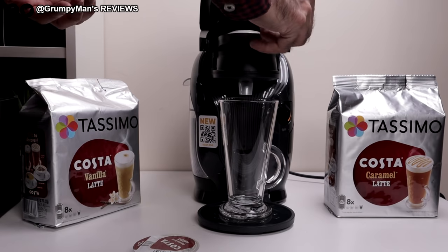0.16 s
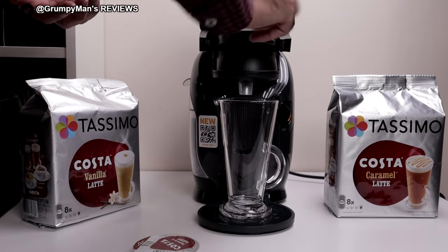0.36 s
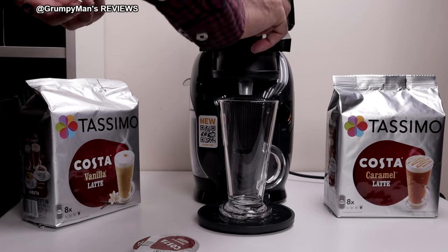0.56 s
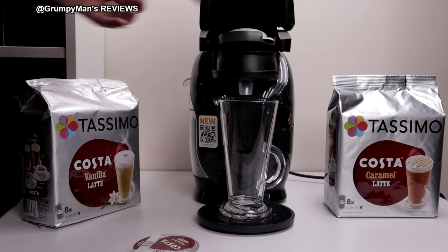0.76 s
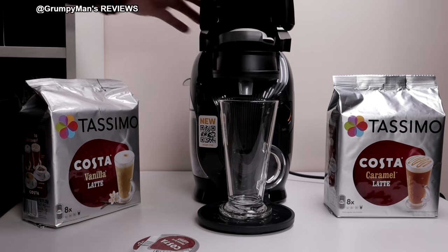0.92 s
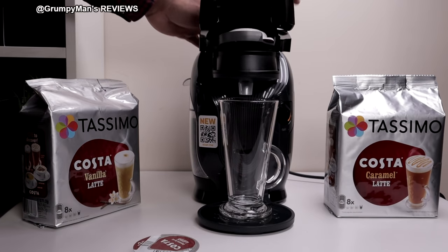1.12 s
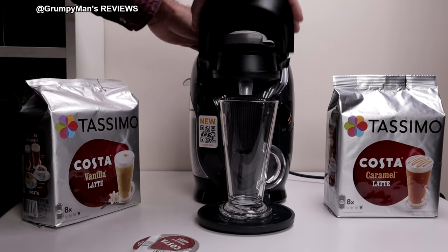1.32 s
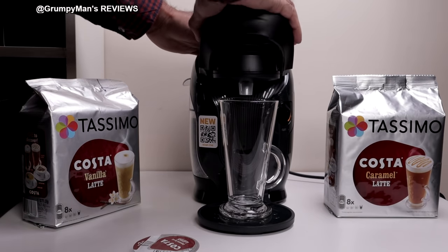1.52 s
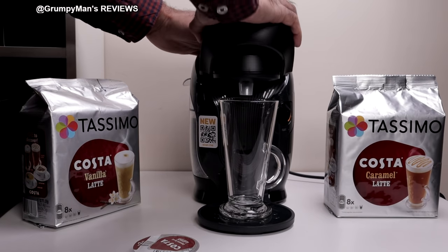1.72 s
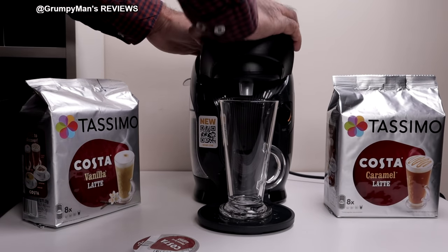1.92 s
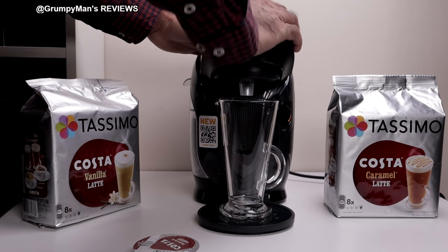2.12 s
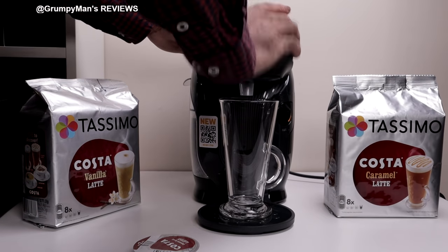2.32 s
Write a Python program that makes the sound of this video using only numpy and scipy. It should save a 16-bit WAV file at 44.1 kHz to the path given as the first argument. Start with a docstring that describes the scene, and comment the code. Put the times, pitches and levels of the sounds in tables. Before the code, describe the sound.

A pod coffee machine being loaded and closed, with small plastic knocks, clicks and scrapes.

```python
"""Loading a pod coffee machine.

A hand seats a pod, reaches up, swings the lid down and presses it until it latches. Each contact
rings the hollow plastic housing and rattles its thin panels. Plastic scrapes between the knocks,
a sleeve swishes, the hinge rubs. Small room, one close microphone."""
import sys
import numpy as np
from scipy import signal
from scipy.fft import rfft, irfft, next_fast_len
from scipy.io import wavfile

SR = 44100
rng = np.random.default_rng(int(sys.argv[2]) if len(sys.argv) > 2 else 0)


def wav_record(signal):
    """Record a signal, one row per channel, as 16-bit PCM in the file named by sys.argv[1]."""
    frames = np.transpose(np.atleast_2d(signal))
    bounded = np.clip(frames, -1, 1)
    # unit amplitude maps onto the largest positive 16-bit level
    quanta = np.round(bounded * 32767).astype(np.int16)
    wavfile.write(sys.argv[1], SR, quanta)


N = 104693

# Room tail. Each row: frequency in Hz, T60 in seconds.
ROOM_T60_S = [(150, 0.63), (400, 0.16), (1000, 0.27), (3000, 0.19), (8000, 0.28), (16000, 0.13)]
# Room tail. Each row: frequency in Hz, gain in dB.
ROOM_GAIN_DB = [(150, -17), (300, -9), (600, -2), (1000, -10.5), (3000, -8), (8000, -13), (16000, -16)]
# Noise and friction spectra. Each row: frequency in Hz, relative level in dB.
FLOOR_COLOUR_DB = [(20, -34.5), (55, 6.5), (100, -7), (150, 11.5), (220, 1), (310, 7), (500, -5),
                   (900, -15.5), (2000, -20), (4000, -20.5), (10000, -17.5), (16000, -21)]
RUMBLE_COLOUR_DB = [(20, 0), (36, 0), (50, 16.5), (75, 6.5), (120, 7.5), (200, -28.5), (500, -1),
                    (2000, -90)]
SLEEVE_COLOUR_DB = [(80, 5.5), (400, 6.5), (900, -1), (2000, -7), (3500, -10), (6000, -12.5), (9500, -23),
                    (13000, -22), (16000, -25)]
HINGE_COLOUR_DB = [(100, -34), (320, 10), (550, -6), (950, 2), (1900, -8.5), (2800, -16.5), (6000, -30),
                   (16000, -41)]
SCRAPE_BODY_COLOUR_DB = [(100, -14.5), (165, -1), (225, -20), (305, 7), (370, -2.5), (650, -13), (900, -7),
                         (1600, -18), (2500, -26), (6000, -43)]
SCRAPE_SQUEAK_COLOUR_DB = [(800, 6.5), (2000, 8.5), (3100, 1), (3700, 4.5), (4050, 4), (4400, 3),
                           (4900, -11.5), (7500, -16.5), (16000, -37)]
# Envelopes. Each row: time in seconds, level in dB.
RUMBLE_LEVEL_DB = [(.93, -70), (1.02, -56.5), (1.12, -61.5), (1.2, -68), (1.68, -64), (1.77, -60),
                   (1.9, -60.5), (2.05, -61), (2.2, -75)]
SLEEVE_LEVEL_DB = [(.8, -72), (.9, -63.5), (1.0, -56), (1.11, -56), (1.18, -62.5), (1.3, -68.5), (1.5, -65)]
HINGE_LEVEL_DB = [(1.2, -73), (1.25, -67), (1.28, -52), (1.41, -57), (1.45, -60), (1.53, -62.5),
                  (1.62, -57), (1.68, -68), (1.8, -57.5), (2.1, -65), (2.2, -123)]
# Plastic sliding on plastic. Each row: peak time, rise and fall in seconds, body and squeak in dB.
SCRAPE_STROKES = [(.012, 0.076, 0.014, -49, -61.5), (.18, 0.017, .015, -58, -72),
                  (0.22, 0.0095, 0.005, -52, -48), (0.394, 0.051, 0.018, -58.5, -73),
                  (0.418, 0.0072, 0.0063, -60.5, -60), (2.146, 0.016, 0.0096, -57, -87),
                  (2.227, 0.011, 0.014, -52, -81), (2.303, 0.0093, 0.016, -53, -52),
                  (2.36, 0.04, 0.039, -54, -69.5)]
# Dry ticks. Each row: start in seconds, level in dB.
TICK_EVENTS = [(1.1936, -48.5), (1.7817, -56)]
# Housing and lid modes. Each row: frequency in Hz, relative level in dB, T60 in seconds.
HOUSING_MODES = [(166.4, 0, 0.13), (306.2, -0.5, 0.067), (331.3, -4, 0.07), (399.6, -16, 0.087),
                 (535.4, -7, .08), (685.4, -11.5, 0.12), (872.2, 7, 0.033), (991, 2.5, 0.037),
                 (1383, 2, 0.036), (1743, 9, 0.013), (2000, -16, 0.037), (3095, 17, 0.045),
                 (3606, 12.5, 0.041), (5120, -22.5, 0.11), (5290, -6.5, 0.017), (12500, 0, .015)]
# Contact bands, thud to snap. Each row: low and high edge in Hz, rise and rattle T60 in seconds,
# rattle over the modes in dB.
CONTACT_BANDS = [(102.6, 189.4, 0.0013, 0.12, -0.5), (264, 502, 0.0055, 0.042, -7.5),
                 (481, 1300, 0.0004, 0.072, -5.5), (1065, 1978, 0.00022, 0.038, 0),
                 (2310, 5800, .0004, 0.033, 5.5), (6200, 14300, 0.00034, 0.028, 18)]
# Pod, lid and latch blows. Each row: start in seconds, then thud, hollow, knock, clack, click, snap in dB.
CONTACT_EVENTS = [ (0.0254, -68, -40.5, -38, -45, -51.5, -66.5), (.0315, -64.5, -33, -35, -62, -54.5, -78),
                  (0.043, -56, -33, -45.5, -50, -61.5, -78), (0.062, -56, -64, -62, -50, -66, -75),
                  (0.089, -53.5, -59, -49, -61.5, -68, -86), (0.2173, -81, -56, -61, -58.5, -51, -61.5),
                  (0.2227, -59, -34, -35, -44, -47.5, -64), (.229, -50, -35.5, -40.5, -57, -70, -76),
                  (0.2403, -57, -50, -35.5, -44, -60, -59.5), (0.2526, -59, -28, -34, -42.5, -44, -55.5),
                  (0.2575, -55, -36.5, -32.5, -55, -47, -73), (0.328, -55.5, -72, -50.5, -50.5, -70, -83),
                  (0.5052, -63, -63.5, -46.5, -58.5, -64, -89), (.514, -58.5, -44, -47, -60, -74, -111),
                  (.674, -58, -59.5, -53, -63, -80, -94), (0.684, -57.5, -51.5, -52.5, -56, -78, -93),
                  (0.9756, -53, -56, -60.5, -75, -73, -85), (1.113, -67, -56, -60.5, -72, -79, -80),
                  (1.238, -56, -62.5, -65, -69, -66, -82), (1.2696, -56, -41.5, -51, -50.5, -63, -85),
                  (1.2993, -53, -55, -46, -71, -65, -80), (1.341, -54, -47, -53.5, -75, -80, -82),
                  (1.5544, -51.5, -43.5, -36.5, -41.5, -56, -78), (1.6847, -64, -50, -48, -85, -83, -89),
                  (1.708, -66, -38, -29, -38.5, -43.5, -54.5), (1.721, -38, -47, -62, -63, -53.5, -70),
                  (1.737, -55, -49, -37.5, -51, -59, -81), (1.836, -68, -38.5, -39.5, -48, -61, -86),
                  (1.8639, -42, -35, -33.5, -41.5, -55.5, -64.5), (1.8743, -48, -43.5, -52, -58, -69, -85),
                  (1.9983, -50.5, -46.5, -39, -51.5, -59, -83), (2.018, -60, -51, -50, -62, -64.5, -76),
                  (2.035, -55, -45, -49.5, -58.5, -70, -87), (2.075, -63.5, -62, -64.5, -61, -69, -93),
                  (2.306, -64, -45, -50, -61, -65, -95), (2.321, -54, -49.5, -59, -57, -69, -90)]

FLOOR_DB = -70.5
ROOM_DELAY_S = 0.008
BOOM_DELAY_S, BOOM_DB, BOOM_BAND_HZ = 0.057, -18.5, (131, 435)
SLIPS_PER_S = 5400
TICK_T60_S, TICK_BAND_HZ = 0.007, (1800, 16000)
MODE_SCATTER_DB, MODE_DETUNE_RATIO = -0.5, 0.0065  # random, per blow
CUTOFF_HZ = 16000


def amp(db):
    """Decibels to gain."""
    return 10 ** (np.asarray(db) / 20)


def log_interp(points, hz):
    """Interpolate (Hz, value) points on a log frequency axis."""
    points_hz, values = np.transpose(points)
    return np.interp(np.log(hz + 1), np.log(points_hz + 1), values)


def envelope(points):
    """Gain per sample from (s, dB) points."""
    return amp(np.interp(np.arange(N) / SR, *np.transpose(points)))


def filtered(x, response):
    """Zero-phase filter with gain response(hz)."""
    size = next_fast_len(N + SR // 2)
    hz = np.fft.rfftfreq(size, 1 / SR)
    return irfft(rfft(x, size) * response(hz), size)[:N]


def coloured(x, colour):
    """Shape x by (Hz, dB) points; scale to rms 1."""
    shaped = filtered(x, lambda hz: amp(log_interp(colour, hz)))
    return shaped / np.sqrt(np.mean(shaped ** 2) + 1e-20)


def bandpass(x, lo_hz, hi_hz, order=3):
    """Causal Butterworth band-pass."""
    return signal.sosfilt(signal.butter(order, [lo_hz, hi_hz], 'band', fs=SR, output='sos'), x)


def equal_energy(x):
    """Scale to the energy of 12.5 ms at rms 1."""
    return x / np.sqrt(np.sum(x ** 2) / (0.0125 * SR) + 1e-20)


def add(track, start_s, sound):
    """Mix a sound into the track."""
    part = track[round(start_s * SR):][:len(sound)]
    part += sound[:len(part)]


def in_room(x):
    """Direct sound, a diffuse tail longest in the bass, and one late low boom from the walls."""
    length = SR // 2
    hz, t, spectra = signal.stft(rng.standard_normal(length), SR, nperseg=256)
    decay = amp(-60 * t / log_interp(ROOM_T60_S, hz)[:, None])
    decay /= np.sqrt(np.mean(decay ** 2, axis=1, keepdims=True) * length)
    gain = amp(log_interp(ROOM_GAIN_DB, hz))[:, None]
    _, tail = signal.istft(spectra * decay * gain, SR, nperseg=256)
    response = np.pad(tail, (round(ROOM_DELAY_S * SR) + 1, 0))
    pulse = signal.unit_impulse(SR // 10)
    add(response, 0, pulse)
    add(response, BOOM_DELAY_S, amp(BOOM_DB) * bandpass(pulse, *BOOM_BAND_HZ, order=2))
    return signal.fftconvolve(x, response)


def room_floor():
    """Steady noise of the quiet room."""
    return amp(FLOOR_DB) * coloured(rng.standard_normal(N), FLOOR_COLOUR_DB)


def arm_movement():
    """Sleeve swish and low rumble as the arm moves."""
    swish = envelope(SLEEVE_LEVEL_DB) * coloured(rng.standard_normal(N), SLEEVE_COLOUR_DB)
    rumble = envelope(RUMBLE_LEVEL_DB) * coloured(rng.standard_normal(N), RUMBLE_COLOUR_DB)
    return swish + rumble


def friction(colour):
    """Tiny random slips of uneven size, coloured by the rubbing part."""
    slips = rng.random(N) < SLIPS_PER_S / SR
    return coloured(slips * rng.standard_normal(N), colour)


def hinge():
    """Hinge friction as the lid comes down."""
    return envelope(HINGE_LEVEL_DB) * friction(HINGE_COLOUR_DB)


def scrapes():
    """Plastic slides on plastic; each stroke swells and fades."""
    out, t = np.zeros(N), np.arange(N) / SR
    body, squeak = friction(SCRAPE_BODY_COLOUR_DB), friction(SCRAPE_SQUEAK_COLOUR_DB)
    for peak_s, rise_s, fall_s, body_db, squeak_db in SCRAPE_STROKES:
        width_s = np.where(t < peak_s, rise_s, fall_s)
        stroke = np.exp(-0.5 * ((t - peak_s) / width_s) ** 2)
        out += stroke * (amp(body_db) * body + amp(squeak_db) * squeak)
    return out


def ticks():
    """Bright ticks, too light to ring the housing."""
    out, t = np.zeros(N), np.arange(SR // 20) / SR
    for start_s, db in TICK_EVENTS:
        burst = rng.standard_normal(len(t)) * amp(-60 * t / TICK_T60_S)
        add(out, start_s, amp(db) * bandpass(burst, *TICK_BAND_HZ, order=1))
    return out


def housing_ring(t, lo_hz, hi_hz):
    """Damped housing modes within one band, alternating in sign."""
    ring = np.zeros(len(t))
    for k, (hz, db, t60_s) in enumerate(HOUSING_MODES):
        if lo_hz < hz < hi_hz:
            detune, scatter = rng.standard_normal(2)
            mode = (-1) ** k * np.sin(2 * np.pi * hz * (1 + MODE_DETUNE_RATIO * detune) * t)
            ring += amp(db + MODE_SCATTER_DB * scatter - 60 * t / t60_s) * mode
    return ring


def contact(levels_db):
    """One blow: per band, housing modes plus a short, dense panel rattle."""
    t = np.arange(SR // 4) / SR
    out = np.zeros(len(t))
    for db, (lo_hz, hi_hz, rise_s, t60_s, rattle_db) in zip(levels_db, CONTACT_BANDS):
        onset = 1 - np.exp(-t / rise_s)
        ring = equal_energy(housing_ring(t, lo_hz, hi_hz) * onset)
        burst = rng.standard_normal(len(t)) * onset * amp(-60 * t / t60_s)
        rattle = equal_energy(bandpass(burst, lo_hz, hi_hz))
        out += amp(db) * equal_energy(ring + amp(rattle_db) * rattle)
    return out


def knocks():
    """Pod, lid and latch strike the housing; the room answers each blow."""
    out = np.zeros(N)
    for start_s, *levels_db in CONTACT_EVENTS:
        add(out, start_s, in_room(contact(levels_db)))
    return out


def scene():
    """Mono mix at the microphone."""
    machine = knocks() + ticks() + in_room(scrapes() + hinge())[:N]
    return (machine + arm_movement() + room_floor())[None]


def record(dry):
    """Brick-wall low-pass."""
    return filtered(dry[0], lambda hz: hz < CUTOFF_HZ)[None]


dry = scene()
out = record(dry)
wav_record(out)
```